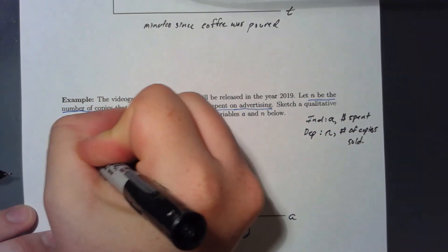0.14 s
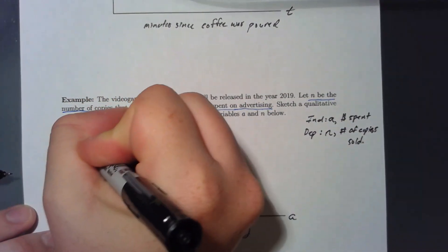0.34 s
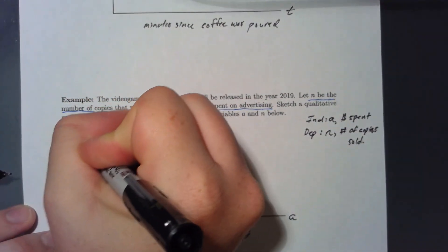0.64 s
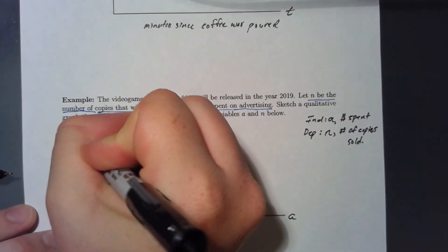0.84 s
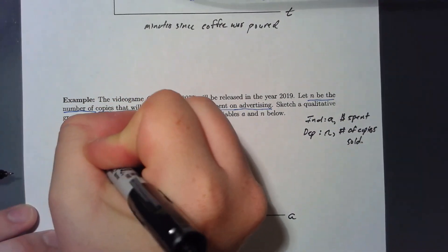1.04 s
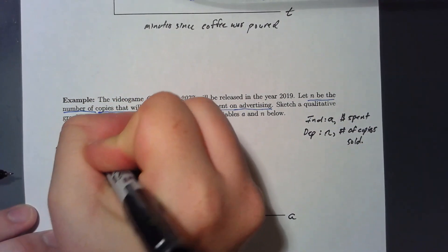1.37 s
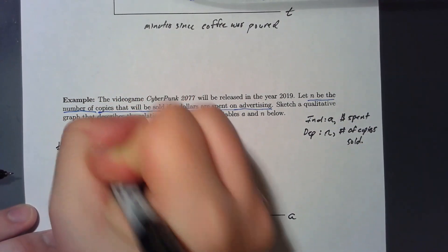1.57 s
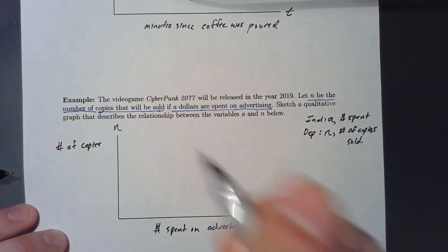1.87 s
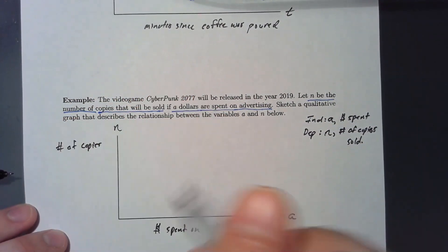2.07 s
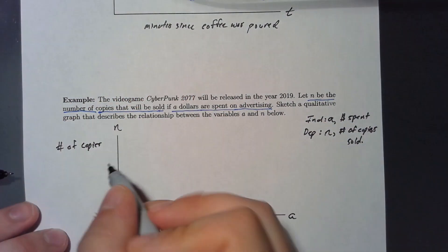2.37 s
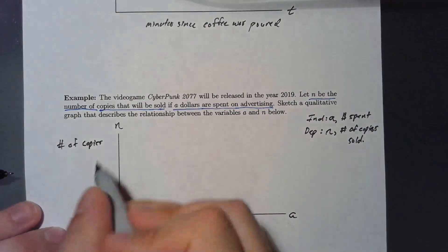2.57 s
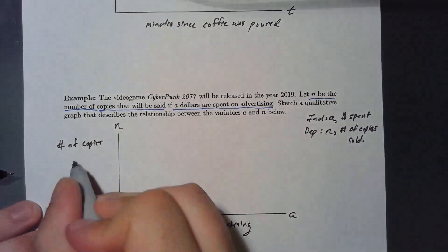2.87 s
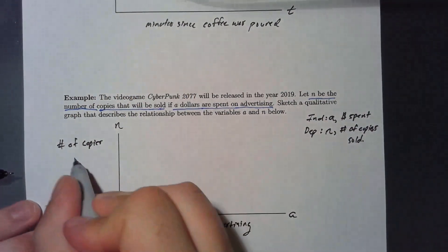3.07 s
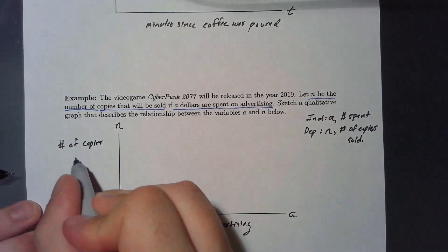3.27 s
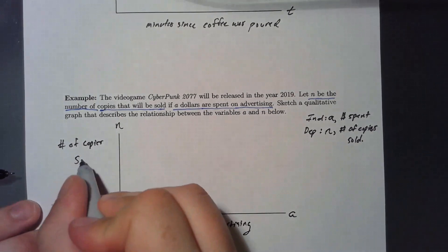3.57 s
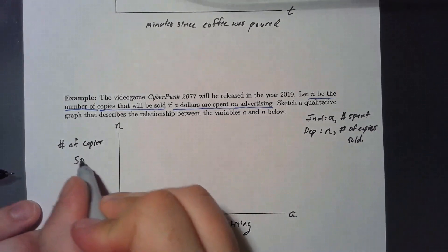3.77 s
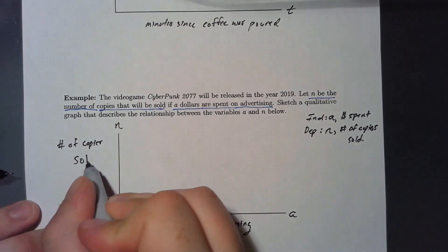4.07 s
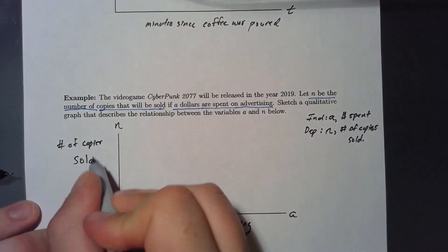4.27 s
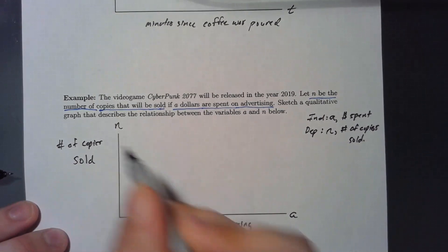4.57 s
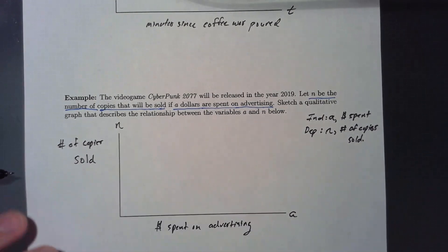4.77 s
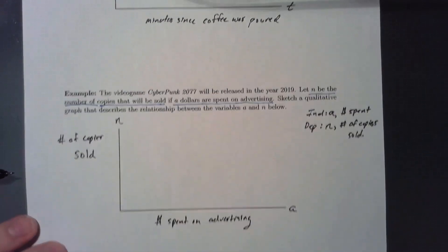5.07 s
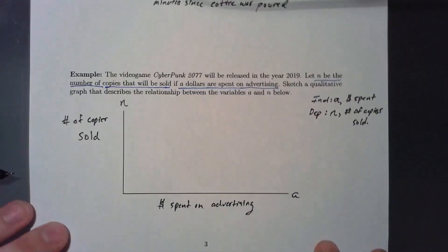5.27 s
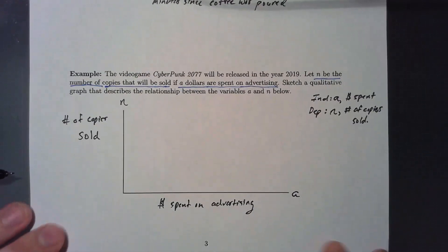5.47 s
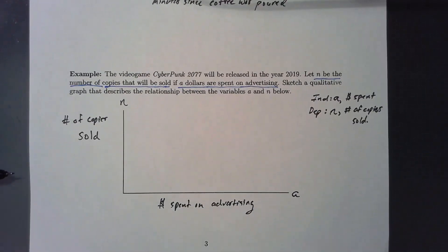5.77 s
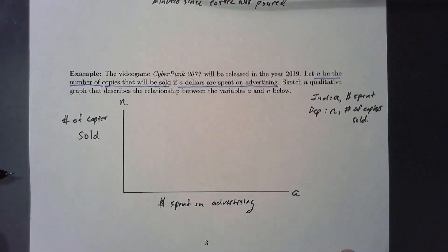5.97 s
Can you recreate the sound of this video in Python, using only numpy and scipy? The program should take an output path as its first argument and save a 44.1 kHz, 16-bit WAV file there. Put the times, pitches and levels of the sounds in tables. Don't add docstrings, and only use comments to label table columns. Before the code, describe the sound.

Throughout, an air conditioner drones across a quiet room: a deep, slightly wavering fan hum, low compressor buzz and a hollow rush of air, with mid-low resonances fluttering in small irregular booms, the strongest near 2.5 seconds. Close to the microphone, a felt marker works on paper. Faint ticks come at 0.15 and 0.4 seconds, softer ones at 0.9 and 1.1, the last with a tiny low scuff, then a double-toned click at 1.9. After a gap, the sharpest, crispest tap lands at 3.3 seconds. Barely audible felt scratches follow around 3.8 and 4.2, then a tight cluster of small clicks and scuffs at 4.5 to 4.6 and a faint rub at 4.8. A duller knock and short paper slide come around 5.1. Only the drone remains to the end, just past 6 seconds. The sound is band-limited, with treble briefly thinning and turning watery.

```python
import sys
import numpy as np
from scipy import signal
from scipy.fft import rfft, irfft
from scipy.io import wavfile
from scipy.ndimage import uniform_filter1d

SR = 44100
rng = np.random.default_rng(int(sys.argv[2]) if len(sys.argv) > 2 else 0)


def how_loud(loudness_db):
    steps = np.asarray(loudness_db, float) / 20
    return 10 ** steps


def generate_wav(sig):
    pcm = np.round(np.clip(np.atleast_2d(sig).T, -1, 1) * 32767).astype(np.int16)
    wavfile.write(sys.argv[1], SR, pcm)


N = 270376
TIME = np.arange(N) / SR
HZ = np.maximum(np.fft.rfftfreq(N, 1 / SR), 1)


# time in seconds, level of the blade hum in dB.
LOUVRE_LOAD = [(0.0, -36.5), (0.56, -42), (0.66, -36), (1.62, -42.5), (1.84, -35), (3.14, -33.5),
               (4.25, -39), (4.3, -40), (4.95, -39), (5.07, -47), (5.89, -34.5), (6.13, -44)]


def fan():
    shaft_hz = 23.36
    turns = shaft_hz * TIME + 0.0025 * wander(1.9)
    blades = np.zeros(N)
    for harmonic, db in ((1, 0), (2, -9), (3, -17)):
        blades += how_loud(db) * np.sin(2 * np.pi * (4 * harmonic * turns + rng.random()))
    blade_db = np.interp(TIME, *np.transpose(LOUVRE_LOAD))
    return tone(shaft_hz, -35) + np.sqrt(2) * how_loud(blade_db) * blades


# beats per second, level in dB against the hum, time of one crest in seconds.
NEIGHBOUR_MOTORS = [
    (.4, -11.5, 4.75),
    (.73, -15.5, 4.9),
]


def beating_hum_db():
    together = 1
    for beats_hz, db, crest_s in NEIGHBOUR_MOTORS:
        together = together + how_loud(db) * np.exp(2j * np.pi * beats_hz * (TIME - crest_s))
    return -35 + 20 * np.log10(abs(together))


# multiple of the compressor's turning rate, level in dB.
SHELL_OVERTONES = [(2, -45), (12, -63), (14, -58), (15, -61), (16, -56.5), (17, -64), (28, -65), (30, -65),
                   (45, -78), (46, -75), (47, -75), (48, -69), (49, -71), (50, -79), (65, -79), (66, -80),
                   (68, -85), (71, -83), (72, -83), (73, -82), (86, -79), (87, -84), (95, -82), (96, -85),
                   (97, -84), (106, -82), (107, -88), (108, -85), (109, -84), (118, -88)]


def compressor():
    stroke_hz, mains_hz = 58.521, 120.0
    sound = tone(stroke_hz, beating_hum_db()) + tone(mains_hz, -50)
    for multiple, db in SHELL_OVERTONES:
        sound += tone(multiple * stroke_hz, db + 2.2 * wander(0.53))
    return sound


# time in seconds, peak level in dB.
OUTLET_GUSTS = [(.07, -29), (.14, -30), (.24, -29), (.49, -34), (.66, -27.5), (.72, -28), (.99, -32),
                (1.19, -25), (1.29, -30), (1.45, -31), (1.59, -26.5), (1.84, -30), (2.129, -24.5),
                (2.38, -25.5), (2.48, -28), (2.55, -19.5), (3.01, -25.5), (3.12, -31.5), (3.24, -25.5),
                (3.63, -22.5), (4.01, -26), (4.49, -27), (4.57, -29.5), (4.77, -23.5), (5.01, -28),
                (5.26, -30.5), (5.4, -26), (5.73, -26), (5.89, -25), (6.1, -28)]


def gust_boom_db():
    rise_s, fall_s = 0.023, 0.027
    power = how_loud(2 * (-34 + 2.0 * wander(8.1)))
    for peak_s, db in OUTLET_GUSTS:
        slope_s = np.where(TIME < peak_s, rise_s, fall_s)
        power = power + how_loud(2 * db) * np.exp(-((TIME - peak_s) / slope_s) ** 2)
    return 10 * np.log10(power)


# frequency in Hz, level in dB per Hz.
AIR_RUSH = [(10, -69), (22, -63.5), (60, -69.5), (105, -75), (200, -58.5), (250, -63), (450, -67),
            (850, -71), (930, -76.5), (1050, -71), (1400, -75), (1550, -80), (1900, -78.5), (2050, -83.5)]
AIR_HISS = [(2050, -85), (2600, -86), (3000, -88), (3300, -87), (3600, -90), (4500, -93), (5000, -94),
            (6000, -97), (6600, -95), (7000, -96.5), (8000, -93)]
# frequency in Hz, width in Hz, level at the top in dB per Hz (in the drone only relative).
RESONANCES = [(47, 10, -56), (69.4, 8.1, -57), (80.4, 35, -55), (132.4, 26, -53.5), (228, 3.6, -65.5),
              (274.5, 11, -55.5), (301, 10, -51.5), (330.3, 14, -52.5), (356, 14, -51), (372.8, 14, -56),
              (400, 52, -60.5), (458.5, 14, -65), (504.7, 14, -60.5), (521, 22, -64), (588.4, 31, -64.5),
              (613, 44, -67), (643, 27, -66.5), (737.4, 30, -64), (817, 68, -66), (1025, 34, -72),
              (1110, 23, -69.5), (1176, 82, -77), (1220, 28, -65.5), (1300, 10, -66), (1372, 53, -72.5),
              (1688, 24, -76.5), (1740, 50, -83), (2142, 56, -81), (2480, 29, -82.5), (3210, 120, -86)]
BOOM_SHOULDERS = [(144.4, 15, -50.5), (184.5, 26, -50), (194, 11, -55)]
# frequency in Hz, width in Hz, level in dB.
BOOM_WAVES = [(154, 8, -5), (162, 9, 0), (170, 8, -4)]


def airflow():
    low, droning, high = RESONANCES[:5], RESONANCES[5:11], RESONANCES[11:]
    hz, db = np.transpose(AIR_RUSH + AIR_HISS[1:])
    smooth = how_loud(2 * np.interp(np.log(HZ), np.log(hz), db))
    rush = coloured(smooth + humps(low + BOOM_SHOULDERS + high)) * how_loud(0.33 * wander(6.6))
    boom = swelling(BOOM_WAVES, gust_boom_db() - 0.4)
    drone = swelling(droning, -36.5 + 1.8 * wander(11))
    return rush + boom + drone


# time in seconds, peak level in dB,
# then the snap, low ring and high ring frequencies in Hz.
MARKER_TAPS = [(0.1448, -41, 5000, 3300, 6500), (0.4187, -34, 5900, 5000, 6500),
               (.884, -43, 4500, 3000, 5000), (1.1234, -45, 4200, 3200, 4650),
               (1.9406, -39, 4800, 3800, 5400), (1.9398, -34.5, 2000, 1950, 2500),
               (3.2776, -26.5, 4920, 5420, 6570), (4.5225, -48, 5300, 5200, 6800),
               (4.5547, -41, 5300, 5220, 6900), (4.568, -43, 6900, 6400, 6900),
               (5.060, -28, 900, 700, 1300), (5.122, -50, 3500, 2400, 3800)]


def marker_taps():
    out, t = np.zeros(N + SR), np.arange(SR // 20) / SR
    for start_s, db, snap_hz, low_hz, high_hz in MARKER_TAPS:
        ring = how_loud(2.0) * np.sin(2 * np.pi * low_hz * t) + np.sin(2 * np.pi * high_hz * t)
        click = np.sin(2 * np.pi * snap_hz * t) * np.exp(-(t * snap_hz - 0.75) ** 2 / 0.33)
        hit = click + how_loud(-15.5) * ring * np.exp(-t / 0.0014)
        for lag_s, part_db in ((0, 2.5075), (0.0015, -6.5)):
            at = int((start_s + lag_s) * SR)
            out[at:at + len(t)] += how_loud(db + part_db) * hit
    return out[:N]


# start in seconds, length in milliseconds,
# level in dB, centre frequency in Hz, width in Hz.
PAPER_SCUFFS = [(.025, 24, -62.5, 5500, 3000), (0.4198, 6, -55.5, 6460, 900), (.419, 6.5, -57, 4300, 2400),
                (.426, 35, -64, 6170, 2500), (.58, 31, -67, 6300, 1500), (1.113, 16, -57, 4600, 900),
                (1.118, 9, -59, 3200, 300), (1.11, 25, -42, 700, 500), (3.279, 10, -61, 6180, 2500),
                (3.805, 14, -68.5, 5000, 2500), (4.13, 17, -63, 6460, 1500), (4.205, 62, -64, 5700, 2500),
                (4.515, 29, -60, 5600, 2200), (4.55, 22, -60.5, 5700, 2600), (4.565, 12, -54.5, 6970, 1100),
                (4.554, 30, -59, 2780, 400), (4.782, 37, -60, 6100, 3000), (5.105, 33, -54.5, 2750, 1600)]


def marker_scuffs():
    out, longest = np.zeros(N + SR), SR // 10
    for start_s, length_ms, db, hz, width in PAPER_SCUFFS:
        grains_db = 3.8 * np.repeat(rng.standard_normal(longest), 40)[:longest]
        fibres = rng.standard_normal(longest) * how_loud(grains_db)
        edges = np.clip([hz - width / 2, hz + width / 2], 200, 9000)
        band = signal.butter(2, edges, "band", fs=SR, output="sos")
        fibres = signal.sosfilt(band, fibres)
        n, at = min(int(length_ms * SR / 1000), longest), int(start_s * SR)
        out[at:at + n] += how_loud(db + 7.5) * fibres[:n] / fibres.std() * np.sqrt(np.hanning(n))
    return out[:N]


def humps(modes):
    return sum(how_loud(2 * db) / (1 + (2 * (HZ - hz) / width) ** 2) ** 2 for hz, width, db in modes)


def coloured(power):
    return irfft(rfft(rng.standard_normal(N)) * np.sqrt(power * SR / 2), N)


def swelling(modes, db):
    noise = coloured(humps(modes))
    window = SR // 22
    power = uniform_filter1d(uniform_filter1d(noise ** 2, size=window), size=window)
    return noise * how_loud(db) / np.sqrt(power)


def tone(hz, db):
    return np.sqrt(2) * how_loud(db) * np.sin(2 * np.pi * (hz * TIME + rng.random()))


def wander(rate_hz):
    drift = coloured(1 / (1 + (HZ / rate_hz) ** 4))
    return drift / drift.std()


def scene():
    machine = fan() + compressor() + airflow()
    return (machine + marker_taps() + marker_scuffs())[None]


# centre in seconds, # lowest frequency affected in Hz,
# share of treble lines kept from 0 to 1.
STARVED_MOMENTS = [
    (.789, 2800, .16),
    (1.676, 4000, .4),
    (2.785, 3300, .12),
    (2.946, 3000, .08),
    (5.452, 3500, .14),
    (6.012, 3600, .11),
]


def starve(x):
    out, n = x.copy(), 1536
    hz, fade = np.fft.rfftfreq(n, 1 / SR), np.sin(np.pi * np.arange(n) / n)
    for centre_s, low_hz, share in STARVED_MOMENTS:
        at = int(centre_s * SR) - n // 2
        lines = rfft(x[at:at + n] * fade)
        prominence = abs(lines) / uniform_filter1d(abs(lines), size=24)
        needed = np.quantile(prominence[hz < 7500], 1 - np.clip(share, 0.02, 0.98))
        lost = (hz > low_hz) & (prominence < needed)
        kept = (hz > low_hz) & ~lost
        out[at:at + n] -= irfft(lines * (lost - 0.3 * kept), n) * fade
    return out


def roll_off(x):
    return signal.sosfilt(signal.butter(12, 7690, fs=SR, output="sos"), x)


# frequency in Hz, level in dB.
BAND_EDGE = [(6800, 0), (7100, -2.5), (7400, -12), (7600, -22.5), (7800, -36.5), (7900, -50), (8100, -60)]


def record(dry):
    hz, db = np.transpose(BAND_EDGE)
    rolloff = how_loud(np.interp(np.log(HZ), np.log(hz), db))
    band = irfft(rfft(dry[0]) * rolloff, N)
    return roll_off(starve(band)[None])


dry = scene()
out = record(dry)
generate_wav(out)
```